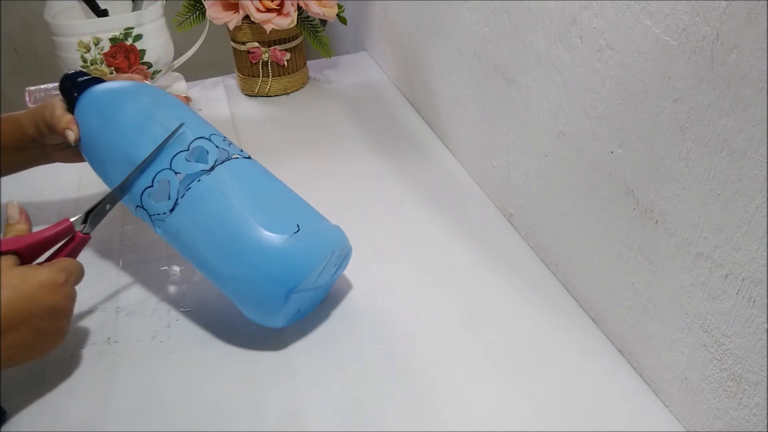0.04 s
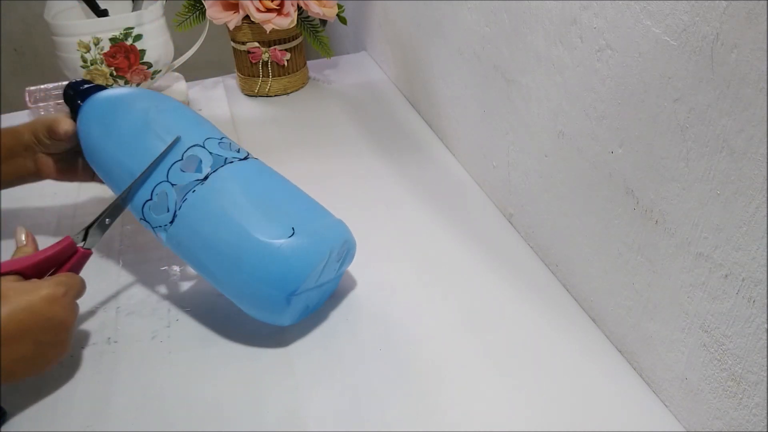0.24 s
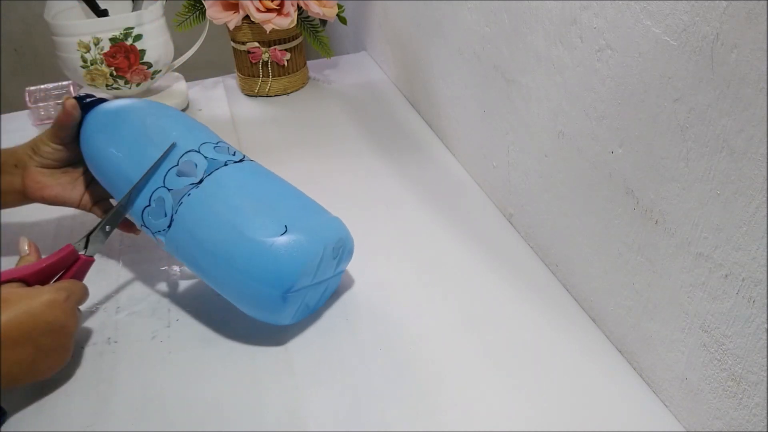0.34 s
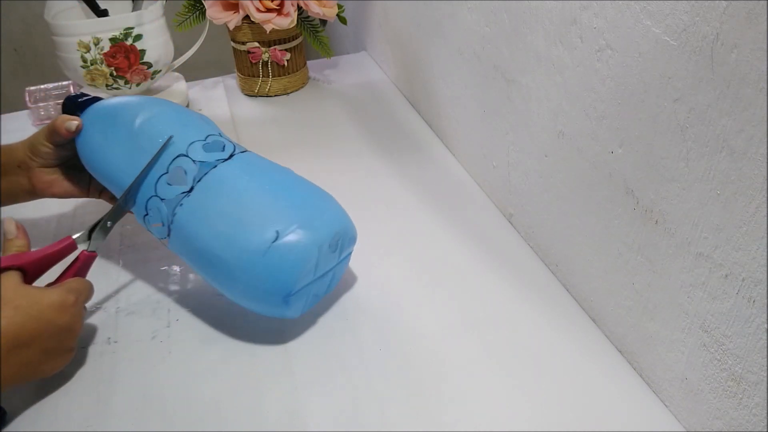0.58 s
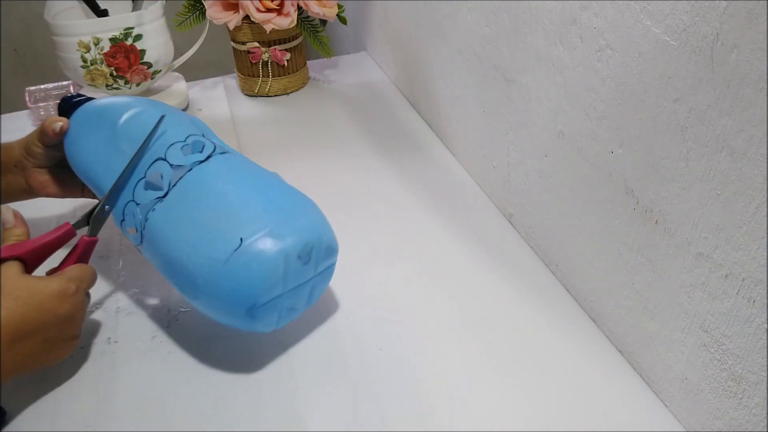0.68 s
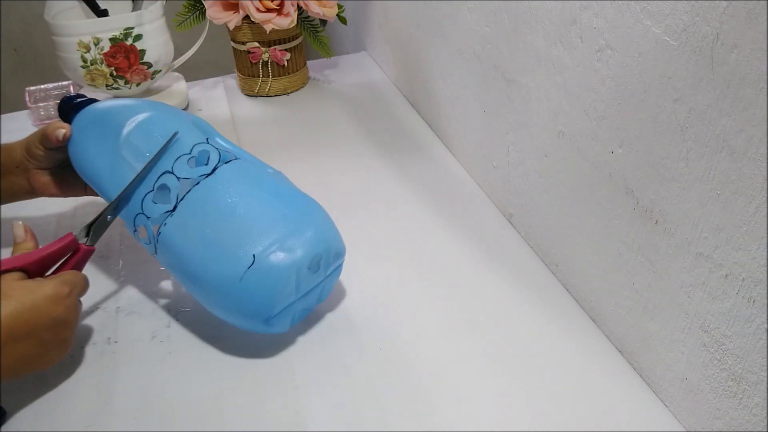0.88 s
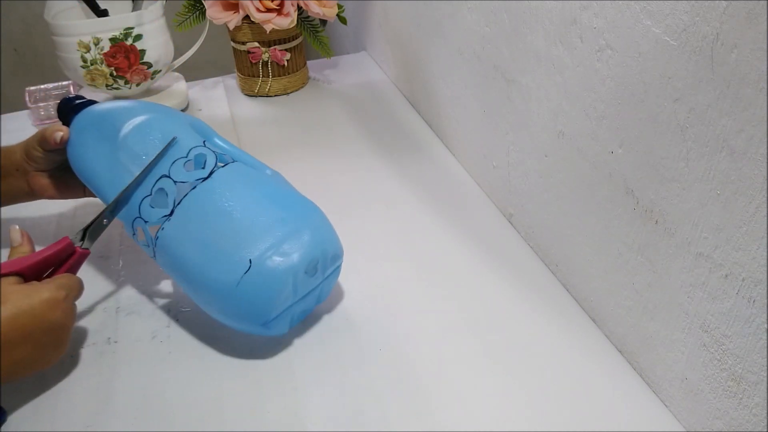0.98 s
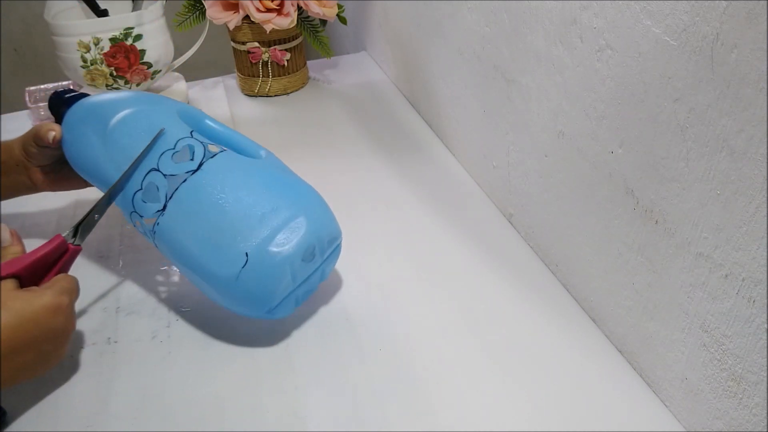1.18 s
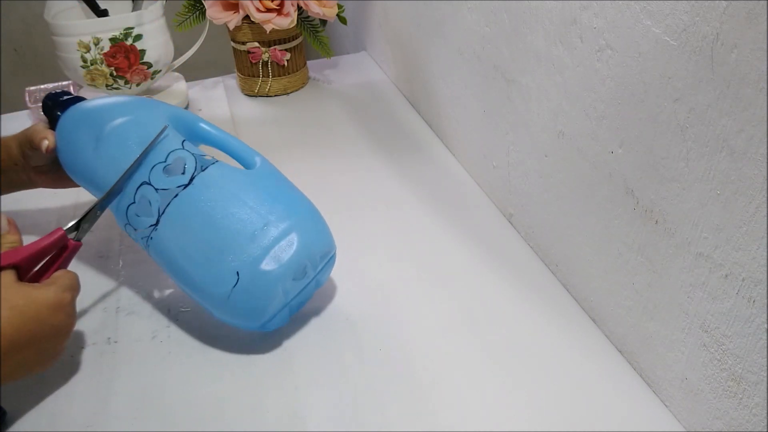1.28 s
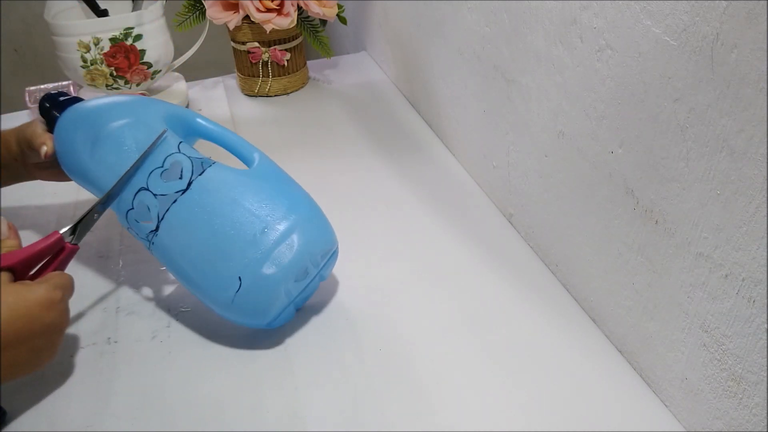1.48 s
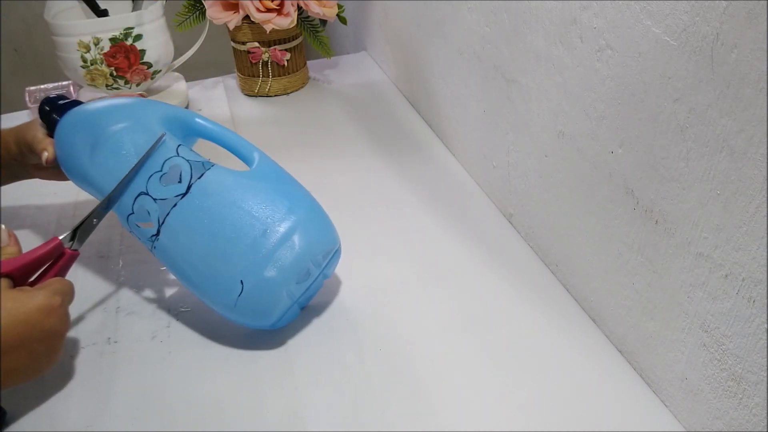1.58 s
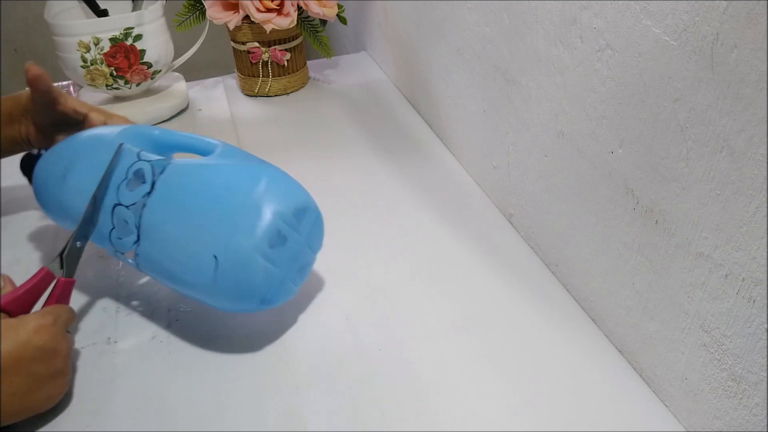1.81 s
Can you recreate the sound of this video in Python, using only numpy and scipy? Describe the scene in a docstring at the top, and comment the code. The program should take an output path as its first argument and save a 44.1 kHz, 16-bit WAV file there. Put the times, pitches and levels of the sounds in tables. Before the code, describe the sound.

Scissors cut into a thin empty plastic bottle: light creaks and snaps lead to two loud, close bites, then hollow knocks, a brief squeak and scattered fading crackles, close to the microphone in a small hard room.

```python
"""Scissors cutting a hollow plastic bottle

Scissors work through the wall of an empty bottle held over a table in a small hard room. Slips of the
blades, snaps and knocks excite its modes; noise bursts and clicks, filtered, give the cracks and the steel.
Two bites ring the resonances of the cut flap, and during long drags the main mode sings as a tone.
Two microphone ports a few centimetres apart hear it from the right, over thuds and quiet room tone.
"""
import sys
import numpy as np
from scipy import signal
from scipy.fft import rfft, irfft, next_fast_len
from scipy.io import wavfile
from scipy.ndimage import uniform_filter1d

SR = 44100
rng = np.random.default_rng(int(sys.argv[2]) if len(sys.argv) > 2 else 0)


def generate_wav(signal):
    """Clip the signal to [-1, 1] and save it as 16-bit WAV at the path in sys.argv[1]."""
    frames = np.transpose(np.atleast_2d(signal))
    scaled = np.clip(frames, -1, 1) * 32767
    pcm = np.round(scaled).astype(np.int16)
    wavfile.write(sys.argv[1], SR, pcm)


N = 81585
TIME_S = np.arange(N) / SR

# bites of the blades through the wall: t/s, level/dB, flap pitch f/Hz, hollow knock level/dB
BITES = [(0.3930, -5.5, 2046, -19.5), (0.4543, -4, 2278, -21)]
# resonances of the cut flap: multiple of its pitch/1, bandwidth/Hz, level/dB
FLAP_RESONANCES = [(.82, 880, -2), (1, 966, 3), (1.2, 860, 2.5), (1.85, 1300, -5), (2.3, 1600, -10),
                   (3.2, 1000, -21)]
BITE_RISE_S, BITE_T60_S = 0.00081, 0.008
RATTLE_DB, RATTLE_T60_S = -24.5, 0.19  # level relative to the bite
FLAP_RISE, FLAP_RISE_S = 0.078, 0.098  # share by which the pitch rises as the flap stiffens; time constant

# modes of the hollow bottle at rest: f/Hz, level/dB, t60/s
BOTTLE_MODES = [(318.8, -8, 0.11), (390.5, -10.5, 0.067), (457.2, 2, 0.06), (548, -9.5, 0.063),
                (571.4, -6.5, 0.05), (734, -32.5, 0.09), (876, -13, 0.031), (1183, -22, 0.026)]
# pitch of the main mode as the hand bends the bottle: t/s, f/Hz
MAIN_MODE_PITCH = [(0, 466), (.3, 457), (.63, 460), (.72, 452), (1.05, 447.2), (1.15, 430), (1.33, 438),
                   (1.45, 456), (1.62, 434), (1.78, 442), (1.85, 452)]
# level of the modes under GRIP_HZ, damped as the grip changes: t/s, level/dB
LOW_MODE_LEVEL = [(0, 2.5), (.34, -1), (0.389, -9.5), (.72, -13), (.82, -3), (1.101, -4.5), (1.498, 0),
                  (1.85, -2)]
# soft knocks of the bottle in the hand: t/s, level/dB
HAND_KNOCKS = [(0.177, -31), (0.209, -27), (0.653, -27), (0.947, -29), (1.138, -21.5), (1.189, -29),
               (1.338, -40.5), (1.703, -51)]
# blade and hand working the bottle: t/s, hollow ring level/dB, crackle level/dB, blade hiss level/dB
BLADE_WORK = [(0.0, -73, -79, -85), (0.078, -48, -68, -75), (0.138, -68, -77, -82),
              (0.182, -42, -61, -55.5), (0.218, -37.5, -56.5, -60), (0.314, -27.5, -43.5, -52.5),
              (0.336, -44.5, -75, -66), (0.391, -51, -41, -68), (0.398, -44.5, -33, -51),
              (0.412, -31, -36, -72), (0.452, -50, -56, -72), (0.462, -32.5, -33, -91),
              (0.53, -48, -52, -78), (0.581, -39.5, -55, -72), (0.633, -28, -45, -63),
              (0.685, -33.5, -60, -68), (0.766, -46.5, -63, -72.5), (0.842, -32, -58, -65.5),
              (0.9, -37, -53.5, -55), (0.962, -40.5, -55, -60.5), (1.016, -79, -74, -65),
              (1.032, -28, -61, -47.5), (1.07, -52, -51.5, -51.5), (1.117, -39.5, -61, -73),
              (1.144, -38, -81.5, -70), (1.17, -47, -47.5, -68), (1.195, -36, -62, -67),
              (1.266, -57, -78.5, -79), (1.384, -37.5, -52.5, -65), (1.442, -39, -62, -72),
              (1.544, -77.5, -83.5, -78.5), (1.576, -40.5, -65.5, -77), (1.642, -59, -83, -84.5),
              (1.784, -86.5, -80.5, -87), (1.806, -37, -65, -69.5), (1.85, -67, -60.5, -69)]
RING_COLUMN, CRACKLE_COLUMN, HISS_COLUMN = 1, 2, 3
REST_HZ, GRIP_HZ = 460.8, 350
RADIATES_HZ = 212  # the bottle is too small to sound below this
KNOCK_S, MODE_SPREAD_DB = 0.0013, 2.78
SLIPS_PER_S, SLIP_SPREAD_DB = 800, 2

# level of the main mode when long drags lock the slips to it: t/s, level/dB
SINGING_LEVEL = [(.16, -93), (.21, -39.5), (.31, -32), (.328, -47), (.345, -70), (.585, -81), (.612, -31.5),
                 (.623, -33), (.632, -23.5), (.649, -47), (.66, -31), (.715, -43.5), (.74, -70)]
SING_WANDER_HZ = 13.7  # RMS unsteadiness of the pitch

# snaps of the wall: t/s, crack level/dB, bright edge level/dB, hollow knock level/dB
WALL_SNAPS = [(0.04, -56.5, -62, -49), (0.0707, -46.5, -53, -60), (0.152, -52, -43.5, -42.5),
              (0.244, -26.5, -33, -31.5), (0.2628, -37, -38, -31), (0.281, -25, -33, -46),
              (0.299, -21.5, -29.5, -34.5), (0.626, -38.5, -46, -28.5), (0.6585, -34.5, -62, -26),
              (0.8325, -24.5, -38.5, -67), (0.8766, -25.5, -37, -67), (0.8885, -33.5, -59, -32.5),
              (1.0259, -28.5, -22, -29.5), (1.098, -49, -40, -30), (1.1301, -28, -35, -59),
              (1.1837, -46, -37.5, -31), (1.1994, -42, -38.5, -41), (1.3816, -49, -52, -43),
              (1.4227, -39, -49, -52), (1.505, -45.5, -55.5, -85), (1.558, -57.5, -54, -48.5),
              (1.5831, -46, -56, -44.5), (1.802, -46.5, -79, -32.5)]
# colour of the snapping wall: f/Hz, level/dB
CRACK_COLOUR = [(410, -34.5), (700, 1), (934, -0.5), (1330, -2.5), (3160, -4), (3830, -12), (5330, -13),
                (7750, -17.5), (9000, -39.5), (11700, -59.5)]
# colour of the small slips: f/Hz, level/dB
CRACKLE_COLOUR = [(410, -22.5), (700, 6.5), (950, -2.5), (1260, -2.5), (1530, -2), (2310, -3), (2770, -8),
                  (6000, -23), (7800, -57)]
CRACK_RISE_S, CRACK_T60_S = 0.0013, 0.018
GRIT_PER_S, GRIT_SPREAD_DB = 2500, 2

# colour of the steel edge: f/Hz, level/dB
EDGE_COLOUR = [(2060, -45.5), (3500, -2), (4460, -1), (5930, 0), (9090, -2.5), (10600, -8.5), (12000, -7),
               (16000, -11.5)]
EDGE_RISE_S, EDGE_T60_S = 0.0011, 0.014
TICK_DB = -18.5  # bright tick relative to its bite

# balance of the direct sound: f/Hz, left minus right level/dB
PORT_BALANCE = [(60, -2), (180, 4.5), (550, 1), (1650, 0), (4970, -4), (15000, 2)]
LEFT_LAG_S = 0.0001
EARLY_DB, EARLY_S, EARLY_HZ = -11.5, 0.008, 715  # level of each bounce, time span, high-pass corner
BITE_WET_DB = -2.5  # the bites face the microphone, so less of them comes by way of the room
TURN_S = 0.3016  # the bottle turns, so the paths through the room keep changing

# reverberation time: f/Hz, t60/s
ROOM_T60 = [(150, 0.16), (500, 0.16), (1200, 0.29), (2500, 0.32), (5000, 0.28), (10000, 0.2), (16000, .2)]
# reverberant strength: f/Hz, level/dB
ROOM_LEVEL = [(150, -8), (500, -8.5), (1200, -0.5), (2500, 1), (5000, -6), (10000, -1.5), (16000, -4.5)]
# left-right likeness of diffuse sound: f/Hz, correlation/1
LIKENESS = [(50, 0.32), (480, 0.92), (800, 0.29), (1500, 0.1), (16000, 0.022)]
ROOM_START_S = 0.0033

# low thuds of hands and bottle through the table: t/s, level/dB
THUD_LEVEL = [(0.0, -69), (0.21, -65.5), (0.292, -49), (0.386, -60), (0.458, -45), (0.498, -56.5),
              (1.107, -72), (1.128, -53.5), (1.236, -74), (1.548, -71.5), (1.565, -53.5), (1.661, -67.5),
              (1.79, -71), (1.808, -58)]
# colour of the thuds: f/Hz, level/dB
THUD_COLOUR = [(30, -41.5), (54, -0.5), (118, 5.5), (178, 0.5), (200, -1.5), (280, -15.5), (440, -120)]
THUD_APART_DB = -13  # part that is opposite in sign at the two ports

# colour of the room tone: f/Hz, level/dB
TONE_COLOUR = [(25, -36.5), (200, -7), (301, -19.5), (354, 2), (439, -3), (659, -24.5), (1130, -22),
               (2410, -22), (3080, -21), (6740, -26), (16000, -43.5)]
TONE_DB, BAND_LIMIT_HZ = -68, 16300


def snips():
    """Forced resonance: each bite is a hard burst, then a fading rattle, heard through the cut flap."""
    out = np.zeros(N)
    for bite in BITES:
        start_s, level_db, pitch_hz, _ = bite
        t = np.maximum(TIME_S - start_s, 0)
        fade = (t > 0) * amp(level_db + RATTLE_DB - 60 * t / RATTLE_T60_S)
        rattle = fade * clicks(4000, 5.2)
        drive = bursts([bite], column=1, rise_s=BITE_RISE_S, t60=BITE_T60_S) + rattle
        flap_hz = pitch_hz * (1 + FLAP_RISE * (1 - np.exp(-t / FLAP_RISE_S)))
        for k, (multiple, width, db) in enumerate(FLAP_RESONANCES):
            hz = multiple * flap_hz
            ring = resonate(resonate(drive, hz, width), hz, width)
            out += (-1) ** k * amp(db) * ring * np.sqrt(SR / (2 * width))
    return high_pass(out, 730, order=2)


def bottle():
    """Modal superposition: slips, snaps, bites and knocks excite the same damped modes."""
    bend = track(MAIN_MODE_PITCH) / REST_HZ
    grip_db = track(LOW_MODE_LEVEL)
    struck = [(row[0], row[3]) for row in WALL_SNAPS + BITES]
    blows = np.array(struck + list(HAND_KNOCKS))
    blow_at = np.round(blows[:, 0] * SR).astype(int)
    # each blow excites each mode in its own random measure
    sway_db = MODE_SPREAD_DB * rng.standard_normal((len(blows), len(BOTTLE_MODES)))
    push = np.hanning(round(KNOCK_S * SR) + 3)
    push /= push.sum()
    # the energy of all rings together scales the slips
    energy = sum(amp(2 * db) * t60 * SR / (4 * np.log(1000)) for _, db, t60 in BOTTLE_MODES)
    slips = effort(RING_COLUMN) * clicks(SLIPS_PER_S, SLIP_SPREAD_DB) / np.sqrt(energy)
    out = np.zeros(N)
    for k, (hz, db, t60) in enumerate(BOTTLE_MODES):
        hits = np.zeros(N)
        np.add.at(hits, blow_at, amp(blows[:, 1] + sway_db[:, k]))
        width = np.log(1000) / (np.pi * t60)
        ring = resonate(through(hits + slips, push), hz * bend, width)
        level = amp(db + grip_db * (hz < GRIP_HZ))
        out += (-1) ** k * level * ring * SR / (2 * np.pi * width)
    return high_pass(out, RADIATES_HZ)


def singing():
    """Stick-slip locking: slips in step with the main mode hold it as a slightly unsteady tone."""
    wander = evened(uniform_filter1d(rng.standard_normal(N), size=600))
    hz = track(MAIN_MODE_PITCH) + SING_WANDER_HZ * wander
    tone = np.sqrt(2) * np.sin(2 * np.pi * np.cumsum(hz) / SR)
    return amp(track(SINGING_LEVEL)) * tone


def wall():
    """Impulsive radiation: sharp cracks of the plastic, and a fine crackle while the blades push."""
    snaps = bursts(WALL_SNAPS, column=1, rise_s=CRACK_RISE_S, t60=CRACK_T60_S)
    grit = effort(CRACKLE_COLUMN) * clicks(GRIT_PER_S, GRIT_SPREAD_DB)
    return through(snaps, colour(CRACK_COLOUR)) + through(grit, colour(CRACKLE_COLOUR))


def blades():
    """Impact and friction: bright ticks at each snap and bite, and a thin hiss of steel on plastic."""
    ticks = bursts(WALL_SNAPS, column=2, rise_s=EDGE_RISE_S, t60=EDGE_T60_S)
    hiss = effort(HISS_COLUMN) * clicks(9000, 1.3)
    bites = amp(TICK_DB) * bursts(BITES, column=1, rise_s=BITE_RISE_S, t60=EDGE_T60_S)
    bite_taps = colour(EDGE_COLOUR[:4], skirt_db=27)
    return through(ticks + hiss, colour(EDGE_COLOUR)) + through(bites, bite_taps)


def table_thud():
    """Structure-borne sound: low lumpy thuds through the table top, not quite alike at the two ports."""
    noise = rng.standard_normal((2, N))
    common, apart = (evened(through(z, colour(THUD_COLOUR, skirt_db=14))) for z in noise)
    level = amp(track(THUD_LEVEL))
    return level * (common + amp(THUD_APART_DB) * np.array([apart, -apart]))


def ports(x):
    """Interaural-type cues: direct sound reaches the right port first, its balance varying with pitch."""
    size = next_fast_len(N + 512)
    hz = np.fft.rfftfreq(size, 1 / SR)
    side = np.array([[0.5], [-0.5]])  # left, right
    balance = amp(side * read(PORT_BALANCE, hz))
    delay = np.exp(-2j * np.pi * hz * side * LEFT_LAG_S)
    return irfft(rfft(x, size) * balance * delay, size)[:, :N]


def near_surfaces(x):
    """Early reflection: a few single bounces off table and wall, other ones for each port."""
    taps = np.zeros((2, round(EARLY_S * SR) + 40))
    delay, sign = rng.random((2, 2, 12))
    at = (30 + delay ** 2 * EARLY_S * SR).astype(int)  # the square crowds the bounces early
    np.put_along_axis(taps, at, np.sign(sign - 0.5), 1)
    treble = high_pass(x, EARLY_HZ, order=2)
    return amp(EARLY_DB) * signal.fftconvolve(treble[None], taps, axes=1)[:, :N]


def room(x):
    """Reverberation: a short dense tail, each band with its own energy and exponential decay."""
    def fall(hz, t):
        decay = amp(-60 * t / read(ROOM_T60, hz))
        energy = (decay ** 2).sum(1, keepdims=True)
        return decay / np.sqrt(energy) * amp(read(ROOM_LEVEL, hz))
    # flat noise sets the scale; 128 samples is the step between frames
    unit = np.sqrt(128) * np.std(diffuse(2048, size=512, gain=lambda hz, t: 1))
    tail = diffuse(SR // 2, size=512, gain=fall) / unit
    tail = np.pad(tail, ((0, 0), (round(ROOM_START_S * SR), 0)))
    return signal.fftconvolve(x[None], tail, axes=1)[:, :N]


def turning(space, x, count=4):
    """Time-varying paths: x feeds several draws of a space in a cycle, fading from one to the next."""
    turn = TIME_S / TURN_S
    out = 0
    for k in range(count):
        phase = (turn - k / count + 0.5) % 1 - 0.5
        fade = np.cos(np.pi / 2 * np.clip(phase * count, -1, 1))
        out = out + space(x * fade)
    return out


def room_tone():
    """Stationary diffuse field: quiet steady air of the room."""
    air = diffuse(N, size=2048, gain=lambda hz, t: amp(read(TONE_COLOUR, hz)))
    return amp(TONE_DB) * evened(air)


def diffuse(length, size, gain):
    """Partial coherence: two-channel noise shaped by gain(hz, t), alike in the bass, not in the treble."""
    frames = 4 * length // size + 5
    hz = np.fft.rfftfreq(size, 1 / SR)[:, None]
    a, b, c, d = rng.standard_normal((frames, len(hz), 4)).T
    left, other = a + 1j * b, c + 1j * d
    same = np.clip(read(LIKENESS, hz), -1, 1)
    pair = np.array([left, same * left + np.sqrt(1 - same ** 2) * other])
    frame_s = np.arange(frames) * size / (4 * SR)
    noise = signal.istft(pair * gain(hz, frame_s), nperseg=size, noverlap=3 * size // 4)[1]
    return noise[:, :length]


def bursts(rows, column, rise_s, t60):
    """Transient excitation: a quick noise burst at each event, scaled by the level in the column."""
    out = np.zeros(N + 2000)
    t = np.arange(2000) / SR
    shape = (1 - np.exp(-t / rise_s)) * amp(-60 * t / t60)
    noise = rng.standard_normal((len(rows), 2000))
    for row, z in zip(rows, noise):
        at = round(row[0] * SR)
        flat = irfft(np.exp(1j * np.angle(rfft(shape * z))))  # all pitches equally strong
        even = flat * np.minimum(10 * shape, 1)
        out[at:at + 2000] += amp(row[column]) * even * np.linalg.norm(shape) / np.linalg.norm(even)
    return out[:N]


def clicks(per_s, spread_db):
    """Random impulse process: clicks of random sign, a few of them large, at unit RMS."""
    chance, sign, size = rng.random((3, N))
    happens = chance < per_s / SR
    return evened(happens * np.sign(sign - 0.5) * amp(-spread_db * np.log(size + 0.0077)))


def effort(column):
    """Amplitude envelope: one level of the blade work, interpolated in dB."""
    table = np.array(BLADE_WORK)
    return amp(np.interp(TIME_S, table[:, 0], table[:, column]))


def resonate(x, hz, width):
    """Heterodyning: shifts the curve hz to zero, smooths, and shifts back, a resonance of gain 1."""
    turn = np.exp(2j * np.pi * np.cumsum(hz * np.ones(len(x))) / SR)
    r = np.exp(-np.pi * width / SR)
    return 2 * (turn * signal.lfilter([1 - r], [1, -r], x / turn)).real


def colour(points, skirt_db=18):
    """Minimum phase: causal unit-energy filter of this spectrum, falling skirt_db an octave outside."""
    hz = np.abs(np.fft.fftfreq(8192, 1 / SR)) + 1
    below = np.maximum(np.log2(points[0][0] / hz), 0)
    above = np.maximum(np.log2(hz / points[-1][0]), 0)
    gain_db = np.maximum(read(points, hz) - skirt_db * (below + above), -100)
    log_gain = np.log(amp(gain_db))
    taps = np.fft.ifft(np.exp(np.conj(signal.hilbert(log_gain)))).real[:4096]
    return taps / np.linalg.norm(taps)


def through(x, taps):
    """Convolution: the response of a linear filter to x."""
    return signal.oaconvolve(x, taps)[:N]


def high_pass(x, hz, order=4):
    """Low-frequency cutoff: a Butterworth high-pass."""
    return signal.sosfilt(signal.butter(order, hz, "high", fs=SR, output="sos"), x)


def track(points):
    """Linear interpolation of a table over time."""
    return np.interp(TIME_S, *np.transpose(points))


def read(points, hz):
    """Interpolation of a table over logarithmic frequency."""
    f, value = np.transpose(points)
    return np.interp(np.log(hz + 1), np.log(f + 1), value)


def evened(x):
    """Normalisation to unit RMS."""
    return x / np.sqrt(np.mean(x ** 2) + 1e-20)


def amp(db):
    """Amplitude ratio of a level in dB."""
    return 10 ** (np.asarray(db) / 20)


def scene():
    """Superposition: direct sound, bounces and reverberation, with thuds and room tone."""
    body = bottle() + singing() + wall() + blades()
    bites = snips()
    wet = body + amp(BITE_WET_DB) * bites
    reflected = turning(near_surfaces, wet) + turning(room, wet)
    return ports(body + bites) + reflected + table_thud() + room_tone()


def record(dry):
    """Band limitation: the recorder's steep linear-phase low-pass."""
    taps = signal.firwin(511, BAND_LIMIT_HZ, window=("kaiser", 9), fs=SR)
    return signal.oaconvolve(dry, taps[None], "same")


dry = scene()
out = record(dry)
generate_wav(out)
```